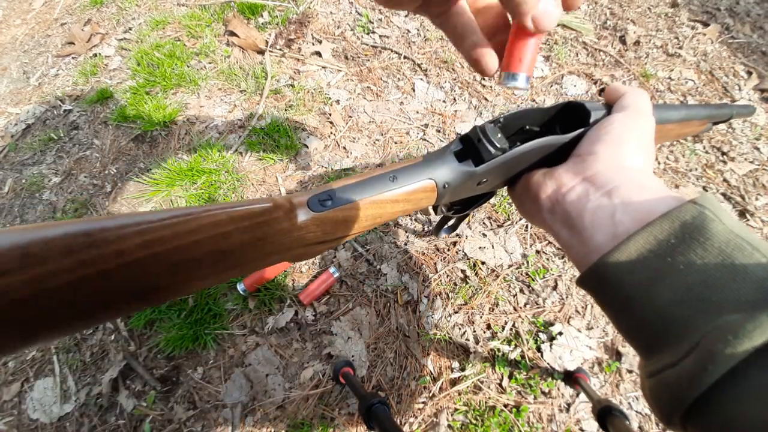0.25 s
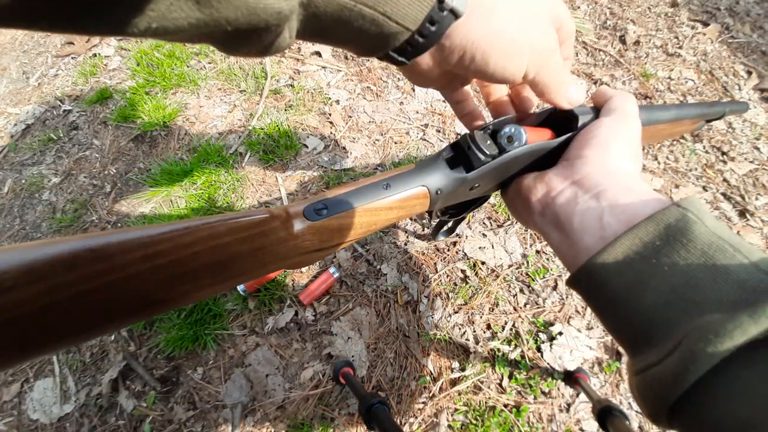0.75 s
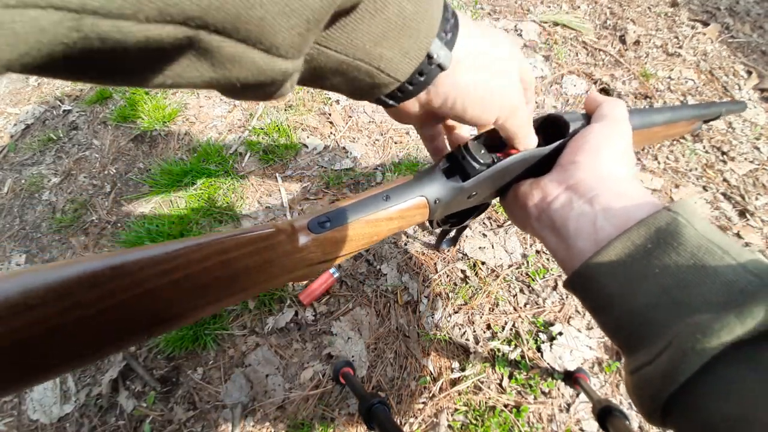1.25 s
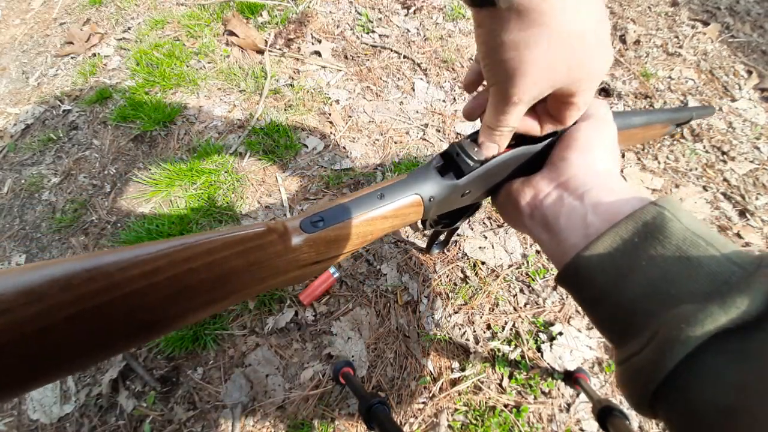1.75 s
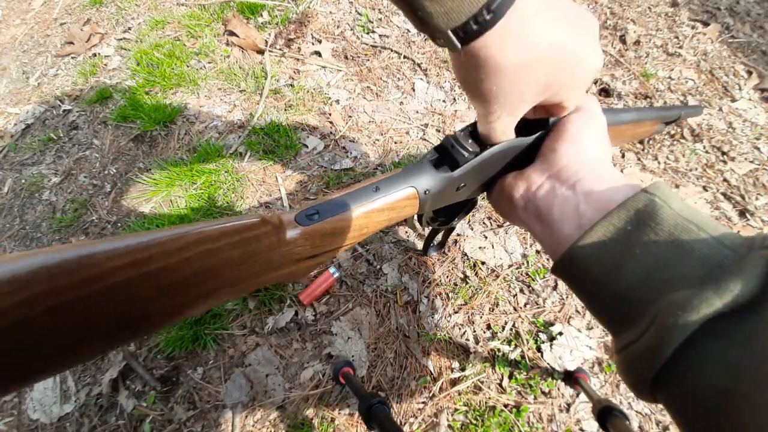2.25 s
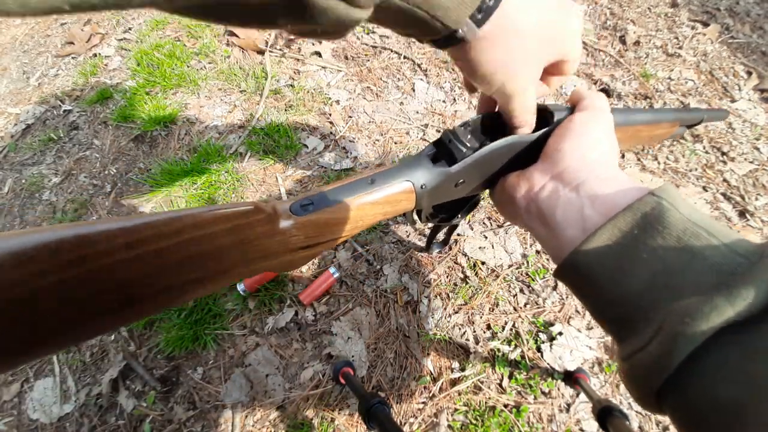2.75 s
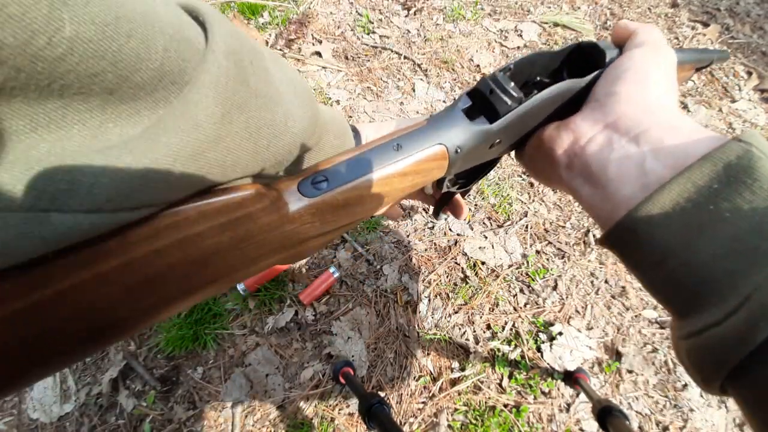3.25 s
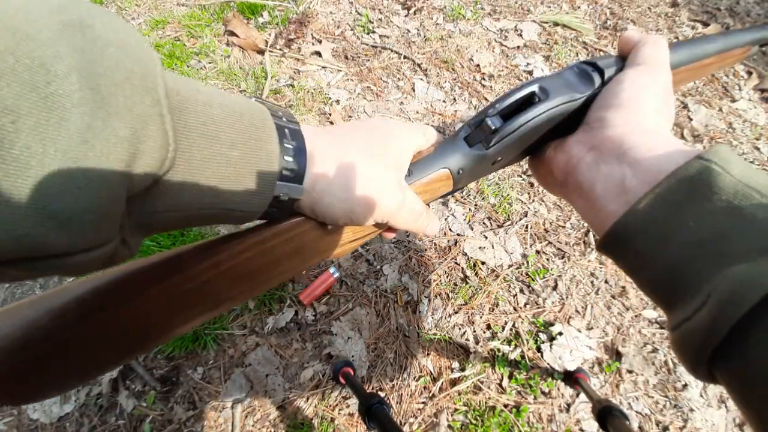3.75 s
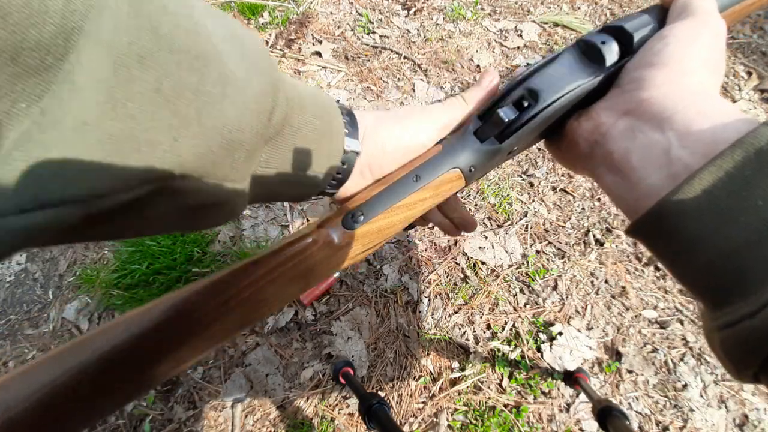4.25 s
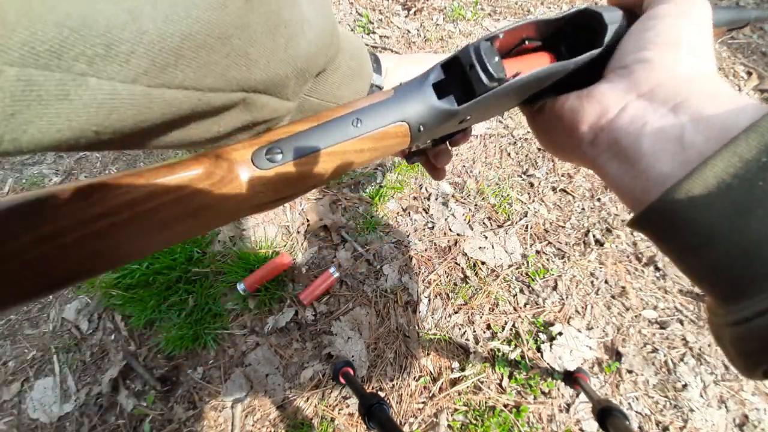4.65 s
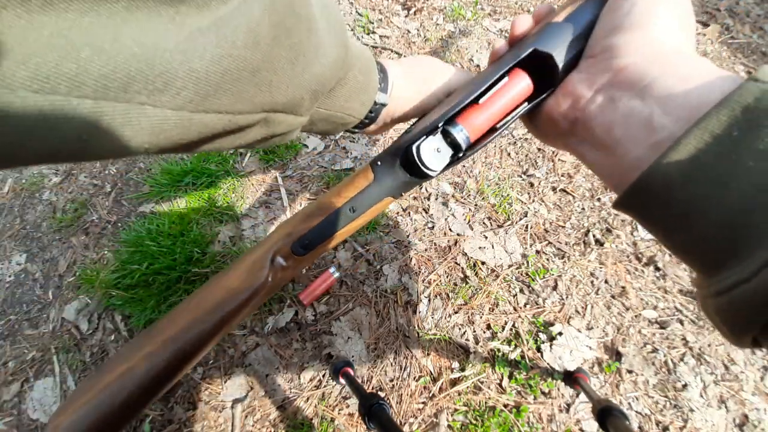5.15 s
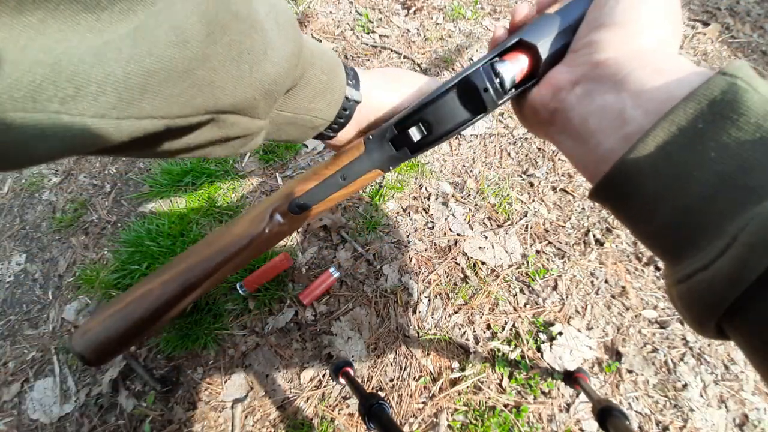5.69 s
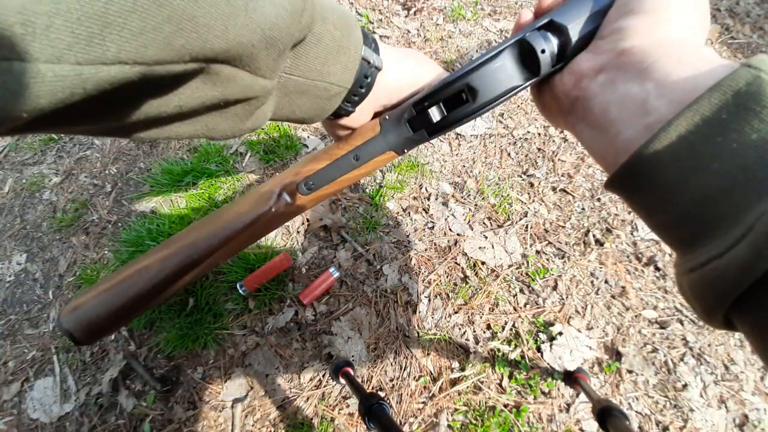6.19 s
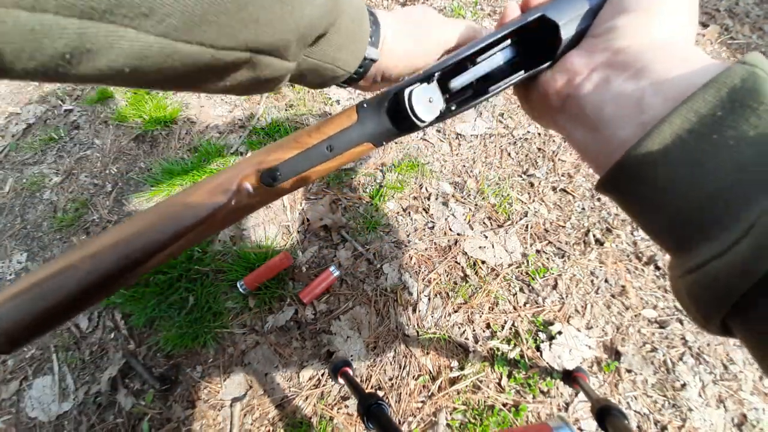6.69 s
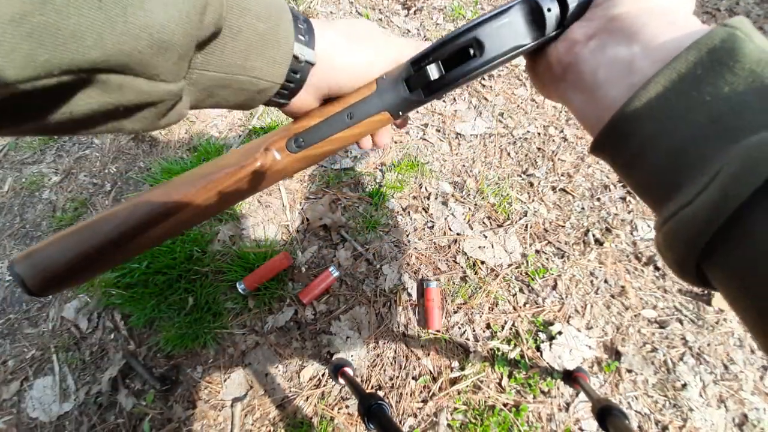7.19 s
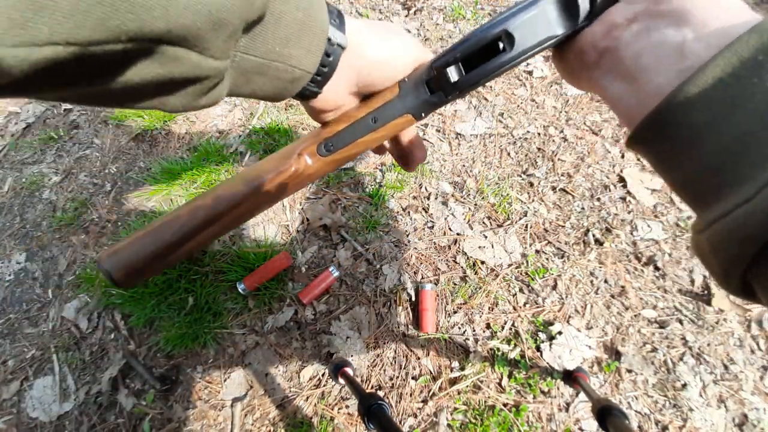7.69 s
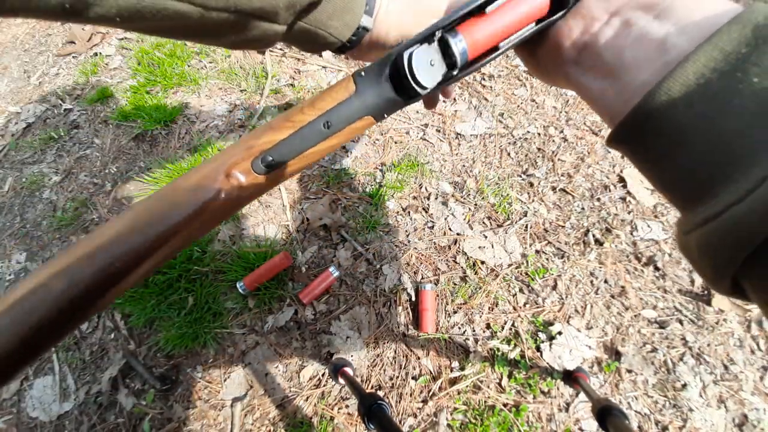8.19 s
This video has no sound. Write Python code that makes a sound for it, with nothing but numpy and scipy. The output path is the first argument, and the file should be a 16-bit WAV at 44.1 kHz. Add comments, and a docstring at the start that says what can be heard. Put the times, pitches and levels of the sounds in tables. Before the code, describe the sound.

A lever-action shotgun is loaded and cycled outdoors, an arm's length from the microphone. From about 0.4 to 1.2 seconds a shell clicks and rattles into the steel action. Lighter clicks and gritty scrapes follow between 1.9 and 2.8 seconds. At 3.4 the lever clacks, slamming shut at 3.7 hard enough to overload the microphone. More sharp, briefly ringing clacks come around 4.3 and 4.9, then smaller clicks and slides from 5.3 to 5.7. A loud burst of cycling runs from 6.5 to 6.9, and an ejected shell bounces on the ground with a hollow knock at about 6.8. Further hard clacks land at 7.3, 7.9 and 8.3 seconds. Sleeves brush softly between the movements. Faint, far traffic rumbles throughout, dropping lower after about 3.8 seconds.

```python
"""A lever-action shotgun is loaded with shells and cycled, an arm's length from a small camera in a wood.
Steel hits steel in sharp clicks and short rings, and the hard slams overload the microphone.
Between the clicks, parts slide with a gritty hiss and sleeves brush. One ejected shell bounces on the
ground with a hollow knock. Underneath lies a bed of far traffic, quieter in the second half."""
import sys
import numpy as np
from scipy import signal
from scipy.fft import rfft, irfft, next_fast_len
from scipy.io import wavfile
from scipy.ndimage import uniform_filter1d

SR = 44100
rng = np.random.default_rng(int(sys.argv[2]) if len(sys.argv) > 2 else 0)


def transcribe(signal):
    """Save signal, clipped to [-1, 1], as a 16-bit WAV file at the path in sys.argv[1]."""
    frames = np.atleast_2d(signal).T
    limited = np.clip(frames, -1, 1)
    pcm = np.round(limited * 32767).astype(np.int16)
    wavfile.write(sys.argv[1], SR, pcm)


N = 371763
HIT, LEAD = 4096, 512  # samples in one hit, and ahead of its crack
T = np.arange(HIT) / SR
FADE = np.log(1000)  # 60 dB of decay

# fader ride of the traffic bed: t/s, level/dB
TRAFFIC_RIDE = [(0, -49), (2.0, -46), (3.7, -49), (3.85, -55), (6.4, -55.5), (8.43, -55.5)]
# traffic EQ: f/Hz, gain/dB
TRAFFIC_EQ = [(25, -10), (53, -7), (75, -2.5), (184, -13.5), (232, -21.5), (450, -22.5), (701, -19),
              (831, -20.5), (1300, -24), (1820, -26.5), (2200, -33), (3000, -48), (4000, -51),
              (8800, -73.5)]
# stereo image of the traffic: f/Hz, left-right correlation (limited to +-1 in use)
TRAFFIC_CORRELATION = [(60, 0.96), (290, 0.94), (640, 0.22), (1400, -0.053), (3000, -1.1)]
# sleeves brushing as the arms move: t/s, hold/s, level/dB
SLEEVE_MOVES = [(0, 0.81, -62.5), (1.059, 0.37, -64), (1.457, .25, -72.5), (1.785, 0.18, -72),
                (2.05, 0.5, -65), (2.53, .3, -63), (3.09, 0.26, -67.5), (3.332, .3, -59),
                (3.717, 0.23, -66.5), (4.077, 0.036, -66.5), (4.303, 0.46, -59.5), (4.94, 0.057, -61.5),
                (5.07, 0.23, -66.5), (5.46, 0.053, -72.5), (5.563, 0.17, -59), (5.8, 0.37, -77.5),
                (6.159, .08, -72.5), (6.481, 0.43, -60), (7.03, 0.23, -69.5), (7.266, 0.15, -63),
                (7.46, 0.36, -71), (7.805, 0.32, -73), (8.253, 0.21, -61)]
# cloth EQ: f/Hz, gain/dB
SLEEVE_EQ = [(1470, -47), (2500, -10), (3310, -20.5), (3800, -17), (5870, -10.5), (8080, -16),
             (11300, -10.5), (16000, -8.5)]
# steel sliding on steel: t/s, hold/s, hiss level/dB, hum over hiss/dB
STEEL_SLIDES = [(0.521, 0.024, -62.5, 16.5), (0.579, .13, -58, 7), (0.731, 0.031, -53.5, 10),
                (1.087, .06, -61.5, 0), (1.134, 0.025, -52, 11.5), (1.894, .03, -56, 5),
                (2.168, 0.032, -56.5, 7), (2.233, 0.011, -30, -8), (2.295, 0.019, -31, -7.5),
                (2.321, 0.087, -46, 1.5), (2.487, 0.019, -40, -0.5), (2.696, 0.054, -57.5, 7.5),
                (3.334, .2, -51, 8), (3.59, .03, -62, 4), (3.701, 0.075, -48.5, 6),
                (3.752, 0.018, -34, -14), (4.287, 0.033, -32.5, 0), (4.359, 0.055, -49.5, 10.5),
                (4.47, 0.069, -53, 6), (4.938, 0.018, -30.5, -2.5), (5.286, 0.044, -60.5, 13.5),
                (5.334, 0.013, -39, -2), (5.56, .12, -63.5, 14.5), (6.468, 0.19, -57.5, 6.5),
                (6.592, .06, -45, 1.5), (6.849, 0.085, -41.5, 4), (7.256, 0.016, -62.5, 9),
                (7.288, 0.026, -37, 0.5), (7.801, 0.12, -44, 4.5), (7.989, 0.025, -48, 4.5),
                (8.243, 0.041, -50.5, 4.5)]
# EQ of the sliding hiss: f/Hz, gain/dB
SLIDE_EQ = [(1470, -44.5), (2500, -9), (3460, -3.5), (6970, -7.5), (7590, -3.5), (8600, -10), (13000, -5.5),
            (16000, -13.5)]
# the ejected shell lands and bounces: t/s, level/dB, f/Hz, t60/s
SHELL_BOUNCES = [(6.746, -13, 567, 0.096), (6.777, -10.5, 304, 0.067)]
# slams that jolt a microphone port: t/s, port (0 left, 1 right), signed push, recovery/s
MIC_SLAMS = [(3.7429, 0.0, 0.45, 0.03), (3.7427, 1.0, 0.25, 0.03), (3.7615, 0.0, -0.74, 0.03),
             (3.7607, 1.0, -0.4, 0.03), (4.9298, 1.0, 0.36, 0.03), (4.9585, 0.0, 0.33, 0.03),
             (4.9593, 1.0, 0.19, 0.008), (6.5821, 1.0, -0.58, 0.03), (6.6082, 0.0, -0.77, 0.002),
             (6.6075, 1.0, -0.09, 0.008), (6.6294, 0.0, -1.7, 0.0005), (6.6306, 1.0, 0.21, 0.03),
             (7.303, 0.0, -0.57, 0.0005), (7.3034, 1.0, -0.43, 0.0005), (7.9079, 1.0, -0.12, 0.002),
             (8.2581, 0.0, -0.33, 0.0005), (8.2583, 1.0, 0.97, 0.0005)]
# lone pings of a small part, and one of the shell as it lands: t/s, f/Hz, level/dB, t60/s
LONE_PINGS = [(4.333, 7580, -36, 0.072), (6.63, 8150, -21.5, 0.09), (6.748, 2180, -1.5, 0.0072),
              (8.022, 8060, -25.5, 0.04)]
# blows that leave the lever ringing: t/s, level/dB, pan left over right/dB, time until damped/s
LEVER_BLOWS = [(3.337, -21.5, 6.5, 0.014), (4.396, -19, -11, .04), (4.927, -16.5, -5.5, .008),
               (6.579, -5.5, -11, 0.01), (7.904, -2.5, -8.5, 0.043)]
# modes of the steel lever: f/Hz, level/dB, t60/s
LEVER_MODES = [(4900, -18, .08), (7520, 0, .07), (7890, -3, .08), (10380, -9, .08), (13550, -9, .07),
               (13730, -12, .07)]
# modes of the receiver: f/Hz, level/dB, t60/s
RECEIVER_MODES = [(1215, -8, 0.014), (1436, -8.5, 0.041), (1560, -0.5, 0.026), (1808, 1.5, 0.015),
                  (1963, -4, 0.014), (2405, -9, 0.02), (2629, -3.5, 0.0091)]
# modes of the small steel parts: f/Hz, level/dB, t60/s
PART_MODES = [(3850, -8.5, .015), (4220, -7, 0.0053), (5390, -9, 0.018), (6530, 2.5, 0.0085),
              (7264, 12.5, 0.0034), (8750, -22.5, 0.014), (11710, -1.5, 0.0072), (12340, -4, .015),
              (13850, -2.5, 0.0079)]
# modes of the wooden stock: f/Hz, level/dB, t60/s
STOCK_MODES = [(276, -0.56, 0.0052), (580, -4.5, 0.0036), (804.3, 1.1, 0.01)]
# modes of the loose shell: f/Hz, level/dB, t60/s
HULL_MODES = [(1555, 6, 0.054), (1847, 14.5, 0.028), (2180, -3.5, 0.031)]
# steel hitting steel: t/s, click level/dB, knock over click/dB, chatter t60/ms, rise/ms
# (t60 and rise are limited in use)
CONTACTS = [(0.3786, -19.5, 3, 5.5, 1.44), (0.4974, -29.5, 6, 11, 0.77), (0.582, -15.5, 1.5, 26, 0.52),
            (0.618, -19.5, -2, 12, 1.5), (0.632, -27, -4, 12, 1.5), (0.6403, -10.5, -4.5, 12, 0.58),
            (0.662, -14.5, -4, 4.1, 2), (0.6814, -10, -25, 5.9, 0.64), (0.6906, -23, 0.5, 14, 3),
            (0.7118, -11.5, -4, 3.8, 0.58), (0.7294, -6, -6.5, 2.7, 1.8), (0.749, -8, -4.5, 10, 1.4),
            (0.7849, -26.5, 1, 39, 0.6), (1.0746, -39, 0, 34, 10), (1.1318, -20, -1.5, 19, 3.1),
            (1.144, -7, -6, 21, 4.7), (1.178, -24.5, -1, 41, 1.6), (1.794, -52, 6.5, 15, 2.1),
            (1.9076, -19, -6, 51, 0.98), (2.06, -46.5, 11, 16, 1.7), (2.1771, -21, -2.5, 38, 1.2),
            (2.2694, -10, -0.5, 91, 3.4), (2.3468, -15, -4, 8.3, 1.3), (2.3788, -19, -3.5, 22, 3),
            (2.395, -35, 7, 39, 9.3), (2.498, -23, 5, 22, 2.5), (2.715, -20, 3, 25, 7),
            (2.7435, -30.5, 4.5, 4.2, 1.4), (2.7799, -25.5, -5, 29, 1.5), (2.983, -35.5, 2.5, 7.2, 1.2),
            (3.092, -46, 9.5, 116, 3.5), (3.3394, -22, -3, 11, 1.2), (3.3555, -34, 20, 24, 6.7),
            (3.386, -30, -1, 11, 3), (3.4314, -6.5, -5.5, 44, 2.8), (3.477, -27, -4, 9, 1.6),
            (3.492, -27, 1, 18, 1.5), (3.501, -5.5, -1, 25, 0.86), (3.522, -39, 21.5, 32, 2.7),
            (3.5983, -36.5, 8.5, 2, 3.4), (3.7274, -3, -6.5, 15, 1.8), (3.7432, -6.5, -3, 38, 1.6),
            (3.7603, -5.5, 0.5, 34, 2.1), (3.9149, -45.5, 16.5, 10.4, 9.6), (4.282, -26.5, 4, 33, 4),
            (4.2967, -27.5, 4, 120, 2.3), (4.311, -15, 2.5, 30, 1.1), (4.3242, -5, -5.5, 22, 6),
            (4.352, -19, -4.5, 70, 1.5), (4.3832, -22, -2, 21, 1.9), (4.3977, -13.5, -4.5, 32, 3.4),
            (4.4574, -6, -4, 52, 0.44), (4.506, -36, -7, 6, 1.1), (4.5334, -20, -4.5, 52, 1.7),
            (4.55, -17.5, -15.5, 7.4, 0.93), (4.6888, -31, -0.5, 57, 2.9), (4.927, -3.5, -8, 68, 0.79),
            (4.958, -3, -3, 22, 2.6), (4.977, -16, -15, 8, 1.4), (5.126, -24.5, -16, 4, 0.56),
            (5.186, -46, 1, 5, 0.83), (5.276, -18, -15, 6.8, 0.55), (5.288, -19.5, -18, 6.5, 1.6),
            (5.2934, -16, -9, 4, 0.84), (5.3046, -24, -15, 9.8, 1.5), (5.3132, -14.5, -15, 8, .7),
            (5.325, -13, -7.5, 21, 3), (5.3385, -17, -14.5, 15, 2.3), (5.3706, -25.5, -1.5, 15, 7.4),
            (5.495, -44.5, -4, 25, 2.5), (5.558, -33.5, 11, 9, 1.2), (5.573, -38.5, 8, 32, 3),
            (5.5882, -33, 5.5, 62, 2.4), (5.613, -33, 8, 130, 2.9), (5.646, -32.5, 9.5, 50, 11),
            (5.675, -14, 3, 10, 0.76), (5.7438, -28, -0.5, 14, 1.7), (5.9976, -34.5, -3.5, 29, 1.2),
            (6.094, -46.5, 1.5, 33, 1.5), (6.5187, -10, -3, 36, 1.3), (6.526, -3.5, -10.5, 7, 0.48),
            (6.555, -31.5, 10, 30, 1.9), (6.5665, -23, -3, 46, 1.9), (6.5798, -9.5, -7.5, 31, 0.48),
            (6.6092, -9, -4.5, 40, 1.2), (6.6288, -4.5, -7, 26, 0.53), (6.7472, -5.5, -21.5, 2.5, 1),
            (6.7765, -18.5, -6, 74, 2.5), (6.834, -23.5, -13, 30, 6.1), (6.8497, -11, -3.5, 59, 1.5),
            (6.89, -21.5, -10.5, 9, 1.1), (6.9072, -16.5, -0.5, 59, 9.5), (6.9213, -9, -4, 26, 3.1),
            (6.944, -37.5, 11, 41, 6.1), (6.965, -26, -14, 13, 1.6), (7.039, -49.5, -1, 9, 1.7),
            (7.129, -45, -14, 13.5, 2.2), (7.2868, -10, -23, 17, 1.6), (7.302, -2.5, -2.5, 37, 1),
            (7.364, -10, -2.5, 32, 2.2), (7.466, -56.5, 23.5, 55, 3.5), (7.8188, -23, -3, 94, 8.9),
            (7.8454, -7, -7.5, 15, 4.4), (7.8512, 0, -9.5, 2.2, 1.2), (7.8805, -15, -5.5, 33, 9.5),
            (7.9049, -14.5, -7.5, 16, 11), (7.951, -23, -30, 55, 1.6), (7.967, -22, -12, 11, 1.1),
            (8.001, -13, -8.5, 37, 4.9), (8.0235, -24, -12, 31, 1.8), (8.064, -32.5, 4, 25, 1.2),
            (8.0708, -15.5, -12, 22, 1), (8.249, -15, -7, 15, 5.3), (8.2578, -5, -10.5, 31, 1.5),
            (8.28, -27.5, -2, 44, 2.8), (8.4094, -35.5, -12, 7.5, 2.3)]

SLEEVE_RISE_DB_PER_S, SLEEVE_FALL_DB_PER_S = 399, 178
SLIDE_RISE_DB_PER_S, SLIDE_FALL_DB_PER_S = 1201, 397
LEVER_FLUTTER_DB, LEVER_DAMPING_DB_PER_S = 1.8, 2499
SEATED_S = .9  # until then the loose shell knocks, afterwards the receiver
TICK_DB, TICK_DB_PER_DB, TICK_SCATTER_DB = 2.8, 0.4, -1  # top-end tick: harder hits are brighter
CLICK_PAN_DB, KNOCK_PAN_DB, PAN_SCATTER_DB = -2.5, 2, 1  # left over right
LOW_CUT_HZ, HIGH_CUT_HZ = 50, 15900


def undb(db):
    return 10 ** (np.asarray(db) / 20)


def band(x, lo_hz, hi_hz):
    return signal.sosfilt(signal.butter(3, [lo_hz, hi_hz], "bandpass", fs=SR, output="sos"), x)


def peak(x, db):
    return x * undb(db) / np.abs(x).max()


def unit_rms(x):
    return x / np.sqrt(np.mean(x ** 2))


def along(points, hz):
    """Reads (f/Hz, value) points on a log-frequency axis."""
    point_hz, values = np.transpose(points)
    return np.interp(np.log(hz + 1), np.log(point_hz), values)


def eq(x, points):
    hz = np.fft.rfftfreq(x.shape[-1], 1 / SR)
    return irfft(rfft(x) * undb(along(points, hz)), x.shape[-1])


def walk(rate_hz, size):
    """Random modulator gliding to a new value rate_hz times a second; spread near 1."""
    hold = int(SR / rate_hz)
    steps = np.repeat(rng.standard_normal(size // hold + 1), hold)
    return 1.2 * uniform_filter1d(steps, hold)[:size]


def stroke(s, hold_s, db, rise_db_per_s, fall_db_per_s):
    """Envelope of one movement: attack, hold, release."""
    t = np.arange(N) / SR
    attack_db = rise_db_per_s * np.maximum(s - t, 0)
    release_db = fall_db_per_s * np.maximum(t - s - hold_s, 0)
    return undb(db - attack_db - release_db)


def place(out, s, sound, pan_db):
    i = int(s * SR)
    out[:, i:i + HIT] += sound * undb([[pan_db / 2], [-pan_db / 2]])


def ring(modes, scatter_db):
    """One blow on an object: each mode gets its own strength, detune and left-right phase."""
    hz, db, t60 = np.transpose(modes)[:, :, None]
    strength, detune, phase, _ = rng.standard_normal((4, len(modes), 1))
    envelope = undb(db + scatter_db * strength) * np.exp(-FADE * T / t60)
    angle = 2 * np.pi * hz * (1 + .006 * detune) * T
    return np.array([(envelope * np.sin(angle + lag)).sum(0) for lag in (0, 2 * phase)])


def rattle(t60, rise_s):
    """A contact is a chatter of micro-impacts around one sharp crack, partly alike left and right."""
    noise = rng.standard_normal((3, HIT))
    grit = undb(3 * walk(2000, HIT))
    shared = np.array([noise[0], np.roll(noise[0], 5)])
    t = T - LEAD / SR
    crack = 1 + 1.6 * np.exp(-np.abs(t) / 0.00012)
    envelope = np.exp(np.where(t < 0, 1.4 * t / rise_s, -FADE * t / t60))
    return (shared + 1.37 * noise[1:]) * grit * crack * envelope


def struck(modes, chatter):
    """The chatter of a contact drives the modes of an object."""
    return signal.fftconvolve(ring(modes, scatter_db=4.1), chatter[:1], axes=1)[:, :HIT]


def traffic():
    """A far, slowly wavering rumble: centred in the bass, wide above."""
    size = next_fast_len(N)
    correlation = np.clip(along(TRAFFIC_CORRELATION, np.fft.rfftfreq(size, 1 / SR)), -1, 1)
    mid, side = rfft(rng.standard_normal((2, size))) * np.sqrt([1 + correlation, 1 - correlation])
    rumble = eq(irfft(np.array([mid + side, mid - side]), size), TRAFFIC_EQ)
    ride_db = np.interp(np.arange(N) / SR, *np.transpose(TRAFFIC_RIDE))
    return unit_rms(rumble)[:, :N] * undb(ride_db + walk(3, N))


def sleeves():
    """Cloth brushes with each arm move: a soft, airy rustle with a little flicker."""
    noise = rng.standard_normal((2, next_fast_len(N)))
    rustle = band(eq(noise, SLEEVE_EQ), 2200, 17000)
    power = sum(stroke(*move, SLEEVE_RISE_DB_PER_S, SLEEVE_FALL_DB_PER_S) ** 2 for move in SLEEVE_MOVES)
    return unit_rms(rustle)[:, :N] * np.sqrt(power) * undb(1.2 * walk(40, N))


def slides():
    """Stick-slip grit, coarser on harder slides; it hums in the receiver and faintly in the stock."""
    hiss_gain, hum_gain = np.zeros((2, N))
    for s, hold_s, db, hum_db in STEEL_SLIDES:
        gain = stroke(s, hold_s, db, SLIDE_RISE_DB_PER_S, SLIDE_FALL_DB_PER_S)
        hiss_gain = np.hypot(hiss_gain, gain)
        hum_gain = np.hypot(hum_gain, gain * undb(hum_db))
    size = next_fast_len(N)
    hiss_db = 20 * np.log10(hiss_gain + 1e-9)
    coarseness = np.resize(np.clip((hiss_db + 75) / 25, .2, 1), size)
    noise = rng.standard_normal((2, size))
    grit = noise * undb(coarseness * (4.1 * walk(500, size) + 2.5 * walk(90, size)))
    hiss = unit_rms(eq(grit, SLIDE_EQ))
    receiver = sum(undb(db) * band(grit, .93 * hz, 1.07 * hz) for hz, db, _ in RECEIVER_MODES)
    hum = unit_rms(receiver) + undb(-7) * unit_rms(band(grit, 250, 1500))
    return hiss_gain * hiss[:, :N] + hum_gain * hum[:, :N]


def shell_drop():
    """A plastic tube lands on leaf litter: a hollow knock with a scuff."""
    out = np.zeros((2, N + HIT))
    for s, db, hz, t60 in SHELL_BOUNCES:
        tube = ring([(hz, 0, t60), (1.38 * hz, -8, .5 * t60)], scatter_db=0.84)
        scuff = band(rattle(t60=0.05, rise_s=.0005), 180, 1020)
        place(out, s, peak(tube, db), pan_db=1.5)
        place(out, s - LEAD / SR, peak(scuff, db - 9), pan_db=1.5)
    return out[:, :N]


def mic_overload():
    """A slam leaves an offset that creeps back; the camera's low cut turns it into a slowing wobble."""
    t = np.arange(4 * HIT) / SR
    out = np.zeros((2, N + len(t)))
    for s, port, push, recovery_s in MIC_SLAMS:
        i = int(s * SR)
        out[int(port), i:i + len(t)] += push * np.exp(-t / recovery_s)
    return uniform_filter1d(out[:, :N], size=24, axis=1)


def pings():
    """A small part, or the landing shell, rings on a single mode."""
    out = np.zeros((2, N + HIT))
    for s, hz, db, t60 in LONE_PINGS:
        place(out, s, peak(ring([(hz, 0, t60)], scatter_db=0), db), pan_db=-3)
    return out[:, :N]


def lever_rings():
    """The loose lever chatters as it rings, until the hand or the next part chokes it."""
    out = np.zeros((2, N + HIT))
    for s, db, pan_db, free_s in LEVER_BLOWS:
        choke_db = -LEVER_DAMPING_DB_PER_S * np.maximum(T - free_s, 0)
        lever = ring(LEVER_MODES, scatter_db=2) * undb(LEVER_FLUTTER_DB * walk(500, HIT) + choke_db)
        place(out, s, peak(lever, db), pan_db)
    return out[:, :N]


def action_clicks():
    """Each steel contact rings the small parts (click, tick) and the receiver or shell and stock (knock)."""
    out = np.zeros((2, N + HIT))
    scatter = rng.standard_normal((len(CONTACTS), 2))
    knock_pan = undb(np.array([[1], [-1]]) * (KNOCK_PAN_DB - CLICK_PAN_DB) / 2)
    for (s, db, knock_db, t60_ms, rise_ms), (tick_draw, pan_draw) in zip(CONTACTS, scatter):
        chatter = rattle(np.clip(t60_ms, 3, 120) / 1e3, np.clip(rise_ms, .2, 9) / 1e3)
        parts = peak(chatter, 0) + peak(struck(PART_MODES, chatter), -7)
        hollow_modes = HULL_MODES if s < SEATED_S else RECEIVER_MODES
        hollow = peak(band(chatter, 1200, 2900), -10.5) + peak(struck(hollow_modes, chatter), 0)
        stock = peak(band(struck(STOCK_MODES, chatter), 200, 1200), -16)
        body = peak(band(hollow, 520, 6500), 0) + stock
        knock = peak(body, knock_db) * knock_pan
        click = peak(band(parts, 3630, 8200), 0)
        tick = peak(band(parts, 9000, 17000), TICK_DB + TICK_DB_PER_DB * db + TICK_SCATTER_DB * tick_draw)
        pan_db = CLICK_PAN_DB + PAN_SCATTER_DB * pan_draw
        place(out, s - LEAD / SR, (click + tick + knock) * undb(db), pan_db)
    return out[:, :N]


def scene():
    """The gun and its faint, short reflection off the ground, over handling noise and traffic."""
    gun = action_clicks() + lever_rings() + pings() + shell_drop()
    ground = rng.standard_normal((2, HIT)) * np.exp(-FADE * T / .06) * (T > .004)
    reflection = undb(-42) * signal.fftconvolve(gun, ground, axes=1)[:, :N]
    return gun + reflection + mic_overload() + slides() + sleeves() + traffic()


def record(dry):
    """The camera's chain: steep low cut, soft clipping of the loudest peaks, steep high cut."""
    low_cut = signal.butter(6, LOW_CUT_HZ, "high", fs=SR, output="sos")
    high_cut = signal.ellip(12, .2, 100, HIGH_CUT_HZ, fs=SR, output="sos")
    return signal.sosfilt(high_cut, np.tanh(signal.sosfilt(low_cut, dry)))


dry = scene()
out = record(dry)
transcribe(out)
```